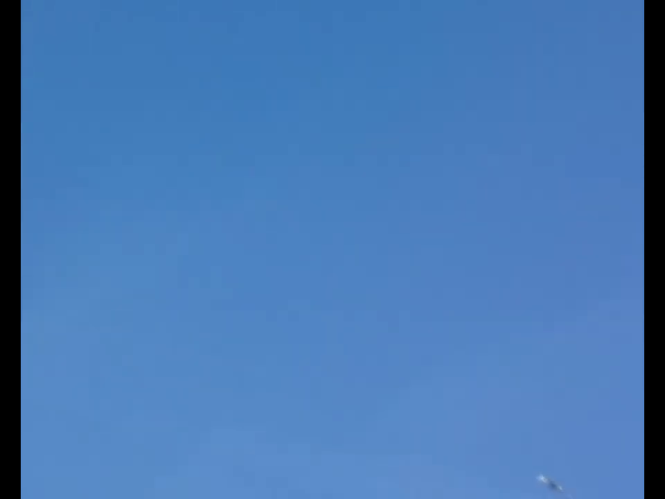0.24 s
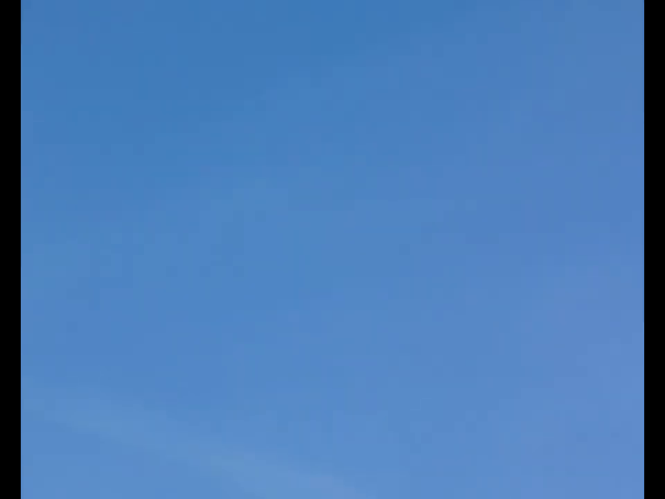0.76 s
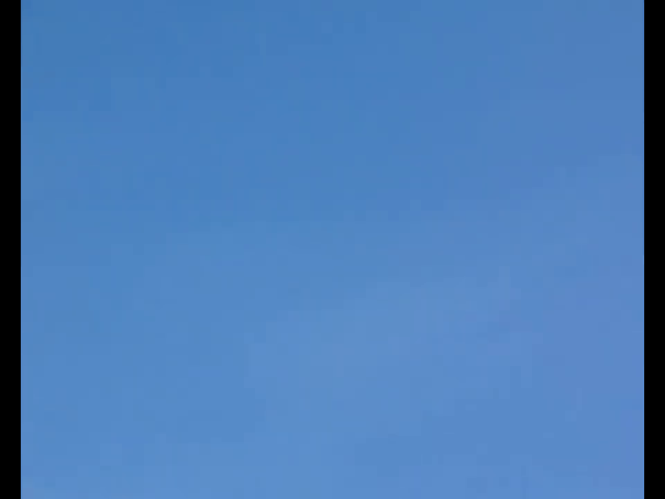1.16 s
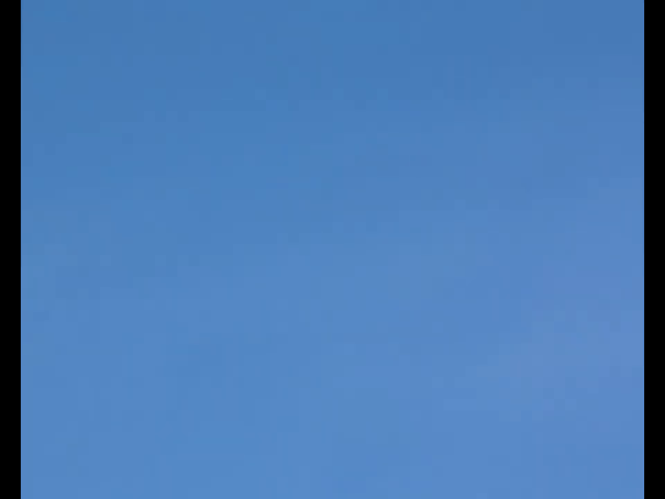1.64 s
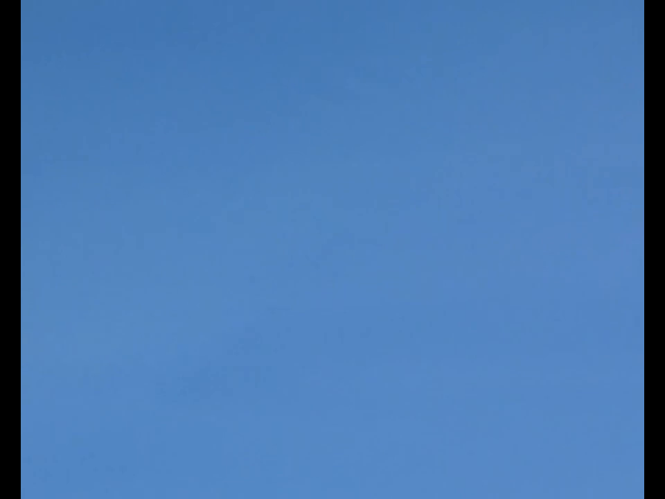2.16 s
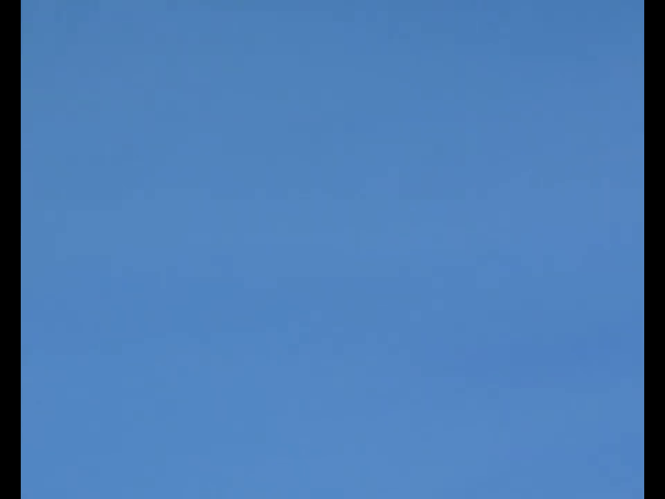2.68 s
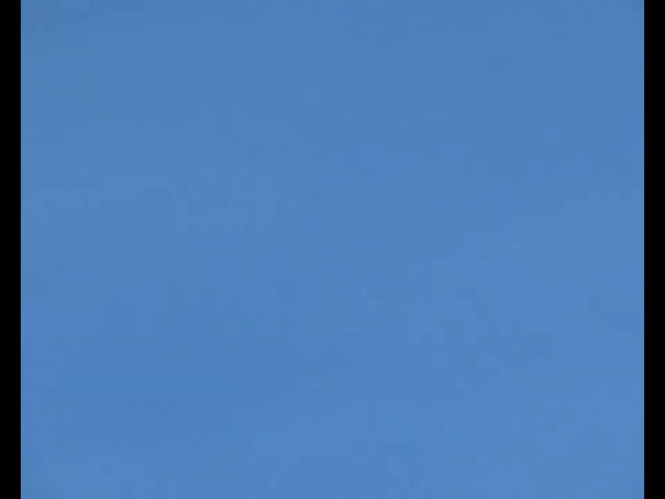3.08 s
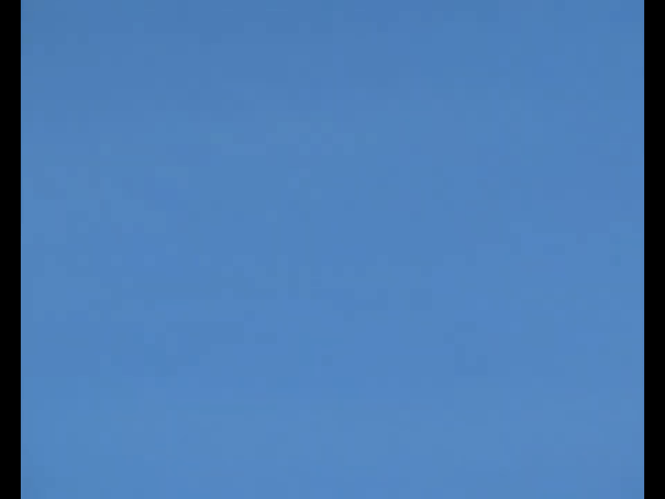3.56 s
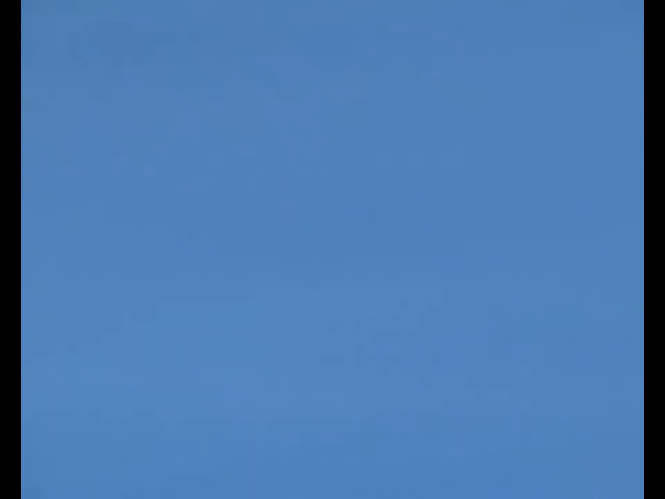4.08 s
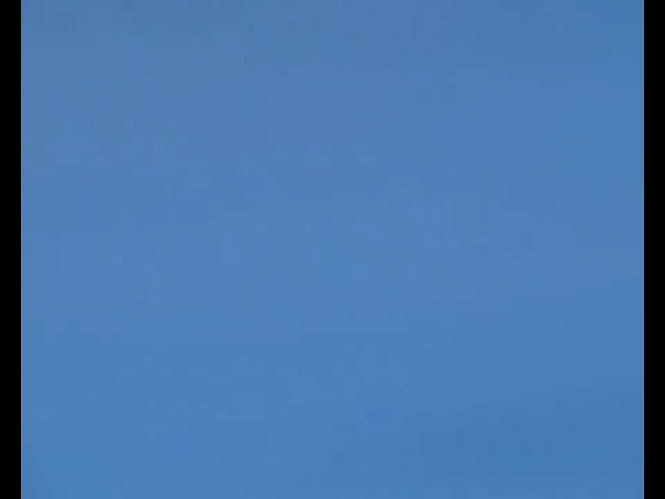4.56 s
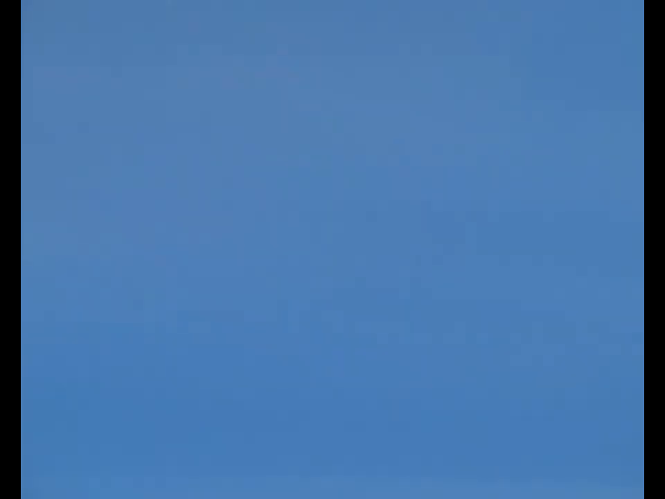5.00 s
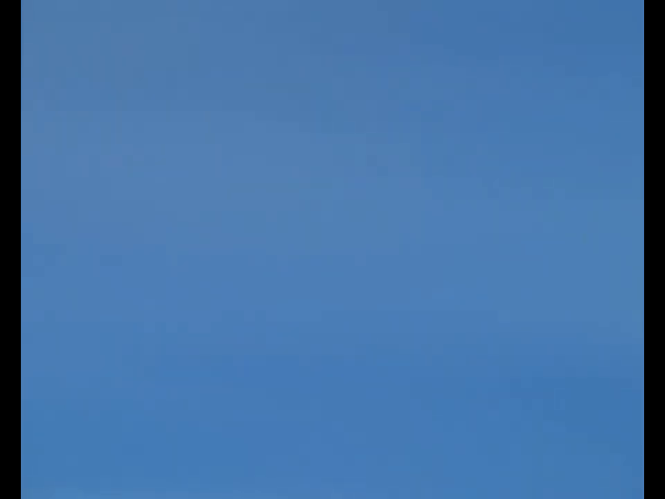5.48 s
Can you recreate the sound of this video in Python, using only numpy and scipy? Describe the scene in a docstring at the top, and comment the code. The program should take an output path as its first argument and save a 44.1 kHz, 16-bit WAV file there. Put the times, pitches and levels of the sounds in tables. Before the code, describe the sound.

A small turbine model jet flies high over an open field. Its rush starts soft and swells in uneven surges, with a slow upward phasing sweep. A hollow howl and a thin whine climb through it, and a brighter howl takes over as the exhaust turns toward the listener. Midway, one small plastic click sounds right at the microphone. Faint open-air rumble and hiss lie underneath.

```python
"""An open field: a small turbine model jet passes high overhead and turns its exhaust to the listener.
Its turbulent rush swells and surges on the moving air; the ground echo combs it into bands that sweep up.
A hollow duct howl, a brighter howl and a thin shaft whine climb through it; early on the intake shrills.
Under it lie open-air rumble, insects and faint, very high whistles. A far bird calls once, there is one
dull bump, and a plastic click rocks the camera, which adds its own hiss and narrow notches."""
import sys
import numpy as np
from scipy import signal
from scipy.fft import rfft, irfft
from scipy.io import wavfile
from scipy.ndimage import uniform_filter1d, map_coordinates

SR = 44100
rng = np.random.default_rng(int(sys.argv[2]) if len(sys.argv) > 2 else 0)


def store_pcm(level_fs):
    """Save levels as 16-bit WAV."""
    pcm = np.round(np.clip(level_fs, -1, 1) * 32767).astype(np.int16)
    wavfile.write(sys.argv[1], SR, np.atleast_2d(pcm).T)


N = 253134
T, HZ = np.arange(N) / SR, np.fft.rfftfreq(N, 1 / SR)
FRAME, HOP = 1024, 256
FRAME_S, BIN_HZ = np.arange(N // HOP + 5) * HOP / SR, np.fft.rfftfreq(FRAME, 1 / SR)

# the turbine shaft's pitch as it reaches the listener: (time [s], pitch [Hz])
SHAFT_PITCH = [(0, 1302), (.45, 1352), (.7, 1454), (1.2, 1580), (1.55, 1661), (2.05, 1750), (2.45, 1805),
               (2.85, 1850), (3, 1864), (3.6, 1868), (4, 1910), (4.3, 1937), (5.74, 1975)]


def amp(db):
    """Decibels to gain."""
    return 10 ** (np.asarray(db) / 20)


def unit_rms(x):
    """Scales to an rms of one."""
    return x / np.sqrt(np.mean(x ** 2) + 1e-20)


def eq_curve(points, hz):
    """Joins (frequency, value) points on a log-frequency axis."""
    f, value = np.transpose(points)
    return np.interp(np.log(hz + 1), np.log(f + 1), value)


def curves(rows, at):
    """One curve for each later column of a table, read along its first column."""
    axis, *columns = np.transpose(rows)
    return [np.interp(at, axis, column) for column in columns]


def coloured(gain):
    """Steady noise of rms one, shaped by a gain for each frequency in HZ."""
    return unit_rms(irfft(rfft(rng.standard_normal(N)) * gain, N))


def noise_band(centre_hz, half_width_hz, slope=4):
    """Steady noise in one band; a higher slope gives steeper skirts."""
    return coloured(1 / (1 + ((HZ - centre_hz) / half_width_hz) ** slope))


def wander(rate_hz):
    """Random drift that thins out above the given rate."""
    return noise_band(0, rate_hz, slope=2)


def blown(hz, half_width_hz):
    """A narrow, breathy band of noise that follows the pitch curve hz."""
    phase = 2 * np.pi * np.cumsum(hz) / SR
    return wander(half_width_hz) * np.cos(phase) + wander(half_width_hz) * np.sin(phase)


def strike(start_s, rise_s, t60):
    """Envelope of a hit: quick attack, exponential decay."""
    age = np.maximum(T - start_s, 0)
    return amp(-60 * np.minimum(age / t60, 10)) * (1 - np.exp(-age / rise_s))


def eddies(frames, bins):
    """Turbulence as random patches in time and frequency."""
    patches = uniform_filter1d(rng.standard_normal((len(FRAME_S), len(BIN_HZ))), frames, axis=0)
    return unit_rms(uniform_filter1d(patches, bins, axis=1, mode="wrap"))


def band_db(spectra, low_hz, high_hz):
    """Level of one band in each frame."""
    inside = (BIN_HZ >= low_hz) & (BIN_HZ < high_hz)
    return 10 * np.log10((spectra[:, inside] ** 2).sum(1))


def exhaust_colour():
    """The exhaust's spectrum in each frame: it turns with the jet and resonates in the tail pipe."""
    # the exhaust from ahead, from the side and from astern: (frequency [Hz], relative level [dB])
    ahead = [(20, -70), (50, -39), (130, -28), (220, -3), (320, -14), (470, -3.5), (640, -7.5), (760, .8),
             (950, 0), (1450, -3), (2300, -11.5), (2900, -20.5), (3600, -26), (4700, -20), (6500, -30),
             (9000, -49), (15000, -89)]
    abeam = [(20, -70), (50, -49), (130, -25), (175, -11), (220, -9), (320, -13), (430, -8.5), (540, 3.2),
             (700, -8), (1100, -9.3), (1500, -8.6), (2000, -10.7), (2900, -16.5), (4800, -23.5),
             (6800, -33), (9000, -45), (15000, -87)]
    astern = [(20, -70), (50, -46), (130, -30), (168, -14.5), (215, -12.5), (310, -13.5), (450, -4.3),
              (640, -2), (770, -3.2), (1050, 2), (1230, -2), (1600, 0), (2300, -5.2), (3200, -14.8),
              (5200, -19.3), (6800, -27.2), (9000, -46), (15000, -87)]
    # the side facing the listener: (time [s], side [0 ahead, 1 abeam, 2 astern])
    facing = [(0.0, 0.53), (1.1, 0.24), (1.6, 0.81), (2.3, 0.74), (2.9, 1.17), (3.4, 1.47), (5.74, 2.0)]
    # the tail pipe's lowest resonance as it arrives: (time [s], pitch [Hz])
    pipe_pitch = [(0, 768), (.65, 747), (1.3, 650), (2, 640), (2.6, 625), (3.2, 655), (3.9, 710),
                  (4.3, 746), (5, 768), (5.74, 790)]
    # its overtones and the hollows between: (frequency [multiple of that pitch], gain [dB])
    pipe_overtones = [(.7, 0), (1, .8), (1.3, -.4), (1.76, -1), (2.2, 1.2), (2.68, -2), (3.15, 2.5),
                      (3.5, -3.8), (4, 3.8), (4.33, -2.6), (4.8, .4), (5.6, 0)]
    side = curves(facing, FRAME_S)[0][:, None]
    side_db = sum(np.maximum(1 - abs(side - k), 0) * eq_curve(spectrum, BIN_HZ)
                  for k, spectrum in enumerate([ahead, abeam, astern]))
    pipe_hz, = curves(pipe_pitch, FRAME_S)
    pipe_db, = curves(pipe_overtones, BIN_HZ / pipe_hz[:, None])
    return amp(side_db + pipe_db)


def surges():
    """Moving air carries the jet over in surges and lulls: dB lifts of rush, hiss and fizz per frame."""
    # each gust sets in, holds and lets go: (start [s], length at half height [s], rise [s], fall [s],
    # rush lift [dB], hiss lift [dB], further lift of the top fizz [dB])
    gusts = [(0.01, 0.049, 0.048, 0.028, 1.7, 4.3, -0.2), (0.247, 0.102, 0.049, 0.031, 0.4, 3.5, -0.9),
             (0.465, 0.05, 0.02, 0.02, 0, -2, 0), (0.51, 0.173, 0.057, 0.044, 3.3, 2.4, 0.6),
             (0.755, 0.125, 0.03, 0.04, -1.5, -2, 1), (0.968, 0.233, 0.038, 0.031, 0.7, 2.3, 1.3),
             (1.318, 0.113, 0.059, 0.027, -0.9, 1.8, 1.5), (1.44, 0.04, 0.015, 0.03, 0, -3.5, -1),
             (1.665, 0.059, 0.038, 0.025, 1.7, 3.8, -1.0), (1.765, 0.045, 0.056, 0.029, -2.4, -0.5, 0.8),
             (1.903, 0.12, 0.048, 0.043, 1.9, 2.5, 0.6), (2.093, 0.141, 0.074, 0.058, 3.2, 5.6, 1.3),
             (2.391, 0.091, 0.055, 0.028, 2.1, 3.8, 1.4), (2.531, 0.085, 0.041, 0.042, 0.2, 2.2, -0.7),
             (2.672, 0.14, 0.069, 0.092, 2.2, 7.3, -1.7), (2.822, 0.091, 0.061, 0.024, -2.0, 2.2, -0.9),
             (2.995, 0.241, 0.056, 0.026, 3.5, 6.7, -2.5), (3.397, 0.212, 0.052, 0.029, 2.2, 5.6, -0.5),
             (3.732, 0.054, 0.029, 0.04, 0.8, 2.6, -0.2), (3.749, 0.074, 0.05, 0.039, 1.4, -0.2, -1.1),
             (3.915, 0.171, 0.055, 0.051, 1.2, 3.6, -1.4), (4.23, 0.173, 0.052, 0.033, 3.3, 5.2, -1.2),
             (4.406, 0.035, 0.036, 0.054, -0.2, -5.2, -0.7), (4.438, 0.05, 0.043, 0.049, 1.5, 4.3, 0.5),
             (4.565, 0.042, 0.028, 0.035, 2.3, 1.2, 2.7), (4.672, 0.045, 0.042, 0.045, 2.4, -0.7, 0.8),
             (4.821, 0.087, 0.08, 0.031, 2.3, 3.6, 1.4), (4.899, 0.15, 0.048, 0.045, -1.2, 0.5, 2.8),
             (5.141, 0.158, 0.058, 0.042, 3.7, 6.7, 1.9), (5.425, 0.067, 0.025, 0.045, 1.5, 4.4, -0.8),
             (5.553, 0.053, 0.041, 0.041, 4.6, 6.6, -3.1), (5.676, 0.04, 0.023, 0.043, 1.4, 4.1, -5.0)]
    lifts_db = 0
    for start, length, rise_s, fall_s, *lift_db in gusts:
        rise = np.clip(.5 + (FRAME_S - start) / rise_s, 0, 1)
        fall = np.clip(.5 + (start + length - FRAME_S) / fall_s, 0, 1)
        lifts_db = lifts_db + np.outer(lift_db, rise * fall)
    return lifts_db


def exhaust(gain_db=2.3, roar_trim_db=.15, hiss_trim_db=-.4, roar_share=.16, flutter=1., patchiness=2.2):
    """Turbulent jet noise: deep roar from the plume, hiss from the nozzle, both shaken by the air."""
    # the pass's slow swell in calm air, in relative levels: (time [s], roar [dB], rush [dB], hiss [dB])
    calm_pass = [(0.0, -43.3, -41.62, -58.99), (0.85, -41.3, -39.96, -53.38), (1.1, -38.0, -36.86, -48.36),
                 (1.8, -36.7, -34.11, -49.04), (2.35, -36.7, -32.96, -48.75), (2.9, -33.8, -28.3, -48.96),
                 (3.3, -34.0, -29.62, -45.0), (3.7, -34.0, -26.13, -38.22), (4.15, -31.0, -23.42, -36.9),
                 (4.55, -31.5, -28.19, -39.15), (4.95, -32.8, -25.59, -35.35),
                 (5.36, -32.8, -27.91, -40.77), (5.74, -33.6, -28.16, -35.77)]
    roar, rush, hiss = curves(calm_pass, FRAME_S)
    rush_lift, hiss_lift, fizz_lift = surges()
    colour = exhaust_colour()
    # three faders, blended across the spectrum; long waves take only a share of each gust
    roar_db = roar + roar_share * rush_lift + roar_trim_db - band_db(colour, 180, 700)
    rush_db = rush + rush_lift - band_db(colour, 750, 2500)
    hiss_db = hiss + hiss_lift + hiss_trim_db - band_db(colour, 3200, 8000)
    lows = eq_curve([(500, .92), (950, .025)], BIN_HZ)
    highs = eq_curve([(1900, 0), (3700, .98)], BIN_HZ)
    swell_db = np.outer(roar_db, lows) + np.outer(rush_db, 1 - lows - highs) + np.outer(hiss_db, highs)
    # long waves ride smoothly through the gusts; short ones surge and twinkle most
    fast_rush_db = rush_db - uniform_filter1d(rush_db, size=40)
    fast_hiss_db = hiss_lift - uniform_filter1d(hiss_lift, size=120)
    rush_depth = eq_curve([(500, -.14), (900, -.29), (1500, -.12), (2200, .53), (3700, .0076)], BIN_HZ)
    hiss_depth = eq_curve([(1500, 0), (2300, .15), (4500, .16), (9000, .26)], BIN_HZ)
    swell_db += np.outer(fast_rush_db, rush_depth) + np.outer(fast_hiss_db, hiss_depth)
    swell_db += np.outer(fizz_lift, eq_curve([(4600, 0), (6000, 1)], BIN_HZ))
    twinkle = flutter * eddies(frames=4, bins=400) + patchiness * np.tanh(eddies(frames=10, bins=14))
    twinkle_db = twinkle * eq_curve([(300, .072), (1500, .55), (5000, 1.29)], BIN_HZ)
    real, imaginary = rng.standard_normal((2,) + colour.shape)
    spectra = colour * amp(swell_db + twinkle_db) * (real + 1j * imaginary)
    return amp(gain_db) * signal.istft(spectra.T, nperseg=FRAME, noverlap=FRAME - HOP)[1][:N]


def ground_echo(sound, softness=.12, waver_ms=.014, steep_loss=.1):
    """Direct sound and ground echo add and cancel in evenly spaced bands, deepest when the jet is low."""
    # the echo comes sooner as the jet sinks to the horizon: (time [s], delay [ms])
    echo_delay = [(0, 4.61), (.35, 4.12), (.65, 3.59), (.85, 3.31), (1.05, 3.11), (1.25, 2.81),
                  (1.45, 2.65), (1.8, 2.53), (2.12, 2.62), (2.35, 2.52), (2.75, 2.27), (2.95, 2.22),
                  (3.25, 2.18), (3.42, 2.21), (3.7, 2.14), (4.05, 2.11), (4.16, 1.99), (4.32, 1.945),
                  (4.58, 1.985), (4.75, 1.92), (5, 1.915), (5.22, 1.805), (5.45, 1.76), (5.55, 1.79),
                  (5.74, 1.7)]
    # grass scatters short waves; at a grazing angle: (frequency [Hz], reflected share [0-1])
    reflection = [(150, .95), (500, .78), (700, .68), (1000, .74), (2000, .6), (4000, .48), (8000, .32)]
    delay_ms = curves(echo_delay, T)[0] + waver_ms * wander(12)  # moving air makes the bands waver
    share = np.clip(eq_curve(reflection, HZ), 0, .95)
    soft_ground_phase = softness * eq_curve([(200, .22), (900, .97), (2000, 0), (3500, .4)], HZ)
    direct = rfft(sound) / np.sqrt(1 + share ** 2)
    reflected = irfft(direct * share * np.exp(-1j * soft_ground_phase), N)
    echo = map_coordinates(reflected, [(T - delay_ms / 1000) * SR], order=3)
    grazing = (delay_ms.min() / delay_ms) ** steep_loss  # a steeper angle reflects less
    return irfft(direct, N) + grazing * echo


def ambience(level_db=-53.):
    """Low rumble of the open air, falling away into microphone hiss."""
    # the bed of air and hiss: (frequency [Hz], relative level [dB])
    bed = [(24, -60), (32, -29), (55, -11), (80, -3.5), (130, -13), (170, -2.5), (260, -10), (600, -9.5),
           (2000, -6.5), (6000, -34.5), (9000, -38.5), (10600, -30), (12500, -37), (15500, -38)]
    return amp(level_db) * coloured(amp(eq_curve(bed, HZ)))


def insects(level_db=-66., swell_db=1.8):
    """A faint, narrow shrill from the grass."""
    shrill = noise_band(centre_hz=4950, half_width_hz=60)
    return amp(level_db + swell_db * wander(14)) * shrill


def whine(waver=.0012, fading_db=2.5):
    """The shaft tone and two octaves above it, wavering and fading on the long path."""
    # the whine is lost once the exhaust points at the listener:
    # (time [s], shaft tone [dB], octave [dB], double octave [dB])
    tone_levels = [(0, -62, -68, -85), (.45, -58, -67, -82), (.57, -43, -66, -80), (.66, -45, -64, -79),
                   (.75, -58, -62, -78), (1.02, -58, -64, -72), (1.24, -58, -52, -72),
                   (1.65, -50, -62, -70), (2.25, -54, -50, -80), (2.7, -60, -66, -82), (3, -58, -63, -65),
                   (3.75, -53, -59, -70), (4, -38, -48, -69), (4.3, -58, -67, -66), (5.74, -75, -77, -85)]
    hz, = curves(SHAFT_PITCH, T)
    phase = 2 * np.pi * np.cumsum(hz * (1 + waver * wander(25))) / SR
    return np.sqrt(2) * sum(amp(db + fading_db * wander(15)) * np.sin(2 ** octave * phase)
                            for octave, db in enumerate(curves(tone_levels, T)))


def howl(shaft_ratio=.452):
    """Air through the duct rings one resonance, which the jet's motion shifts in step with the whine."""
    # the hollow howl's envelope: (time [s], level [dB])
    envelope = [(0, -74), (.5, -48), (.95, -39.5), (1.45, -38.5), (1.7, -43), (3, -42), (3.4, -64),
                (4, -71)]
    db, = curves(envelope, T)
    shaft_hz, = curves(SHAFT_PITCH, T)
    return amp(db) * blown(shaft_ratio * shaft_hz, half_width_hz=46.)


def intake():
    """Air rushing into the intake whistles in one narrow band."""
    # the shrill carries while the intake faces the listener: (time [s], level [dB])
    envelope = [(0, -70), (.45, -68), (.7, -61), (1.05, -58), (1.4, -66), (1.75, -58), (2.1, -64),
                (2.6, -63), (3, -80)]
    db, = curves(envelope, T)
    return amp(db) * noise_band(centre_hz=4670, half_width_hz=55)


def bird(gain_db=-.3, roughness=.021, echo_s=.018, echo_db=-6.):
    """A far, rough whistle that arches and falls, smeared by one echo."""
    # one slurred note: (time [s], pitch [Hz], relative level [dB])
    slur = [(.11, 4350, -66), (.145, 4780, -53), (.18, 4900, -56), (.22, 4580, -54), (.26, 4000, -53),
            (.29, 3430, -54), (.32, 2740, -50), (.34, 2580, -70)]
    hz, db = curves(slur, T)
    phase = 2 * np.pi * np.cumsum(hz * (1 + roughness * wander(300))) / SR
    singing = (T > slur[0][0]) & (T < slur[-1][0])
    call = amp(db + gain_db) * np.sin(phase) * singing
    return call + amp(echo_db) * np.interp(T - echo_s, T, call)


def bump(level_db=-38.):
    """One soft, dull bump of low noise."""
    body = noise_band(centre_hz=280, half_width_hz=140)
    return amp(level_db) * body * strike(start_s=.945, rise_s=.005, t60=.09)


def upper_howl(gain_db=-1.):
    """A bright, hollow band in the rush, rising from about 1.3 to 1.7 kHz."""
    # the band's climb: (time [s], pitch [Hz], relative level [dB])
    climb = [(2.4, 1290, -62), (2.75, 1320, -40), (2.95, 1350, -39), (3.3, 1390, -47), (3.5, 1450, -36),
             (4.02, 1440, -33), (4.25, 1550, -32), (4.5, 1510, -39), (4.8, 1540, -35), (5.2, 1625, -34),
             (5.4, 1640, -42), (5.74, 1680, -42)]
    hz, db = curves(climb, T)
    return amp(db + gain_db) * blown(hz, half_width_hz=45.)


def click(rise_s=.0002, tilt_db_per_octave=0.):
    """One small click: a cluster of snaps, each ringing the plastic for a few milliseconds."""
    # the snaps: (time [s], relative level [dB], ring [Hz], bandwidth [Hz], t60 [s])
    snaps = [(3.0782, -23, 4230, 800, 0.014), (3.0778, -34, 11500, 5000, .0099),
             (3.0798, -31.5, 11500, 3500, .008), (3.0802, -22, 2480, 500, .016),
             (3.0811, -21, 5350, 600, .015), (3.0824, -28, 7450, 700, .013)]
    out = np.zeros(N)
    for start_s, db, hz, width_hz, t60 in snaps:
        ring = noise_band(hz, width_hz / 2, slope=2)
        envelope = amp(db + tilt_db_per_octave * np.log2(hz / 5000)) * strike(start_s, rise_s, t60)
        out += np.sqrt(np.mean(envelope ** 2)) * unit_rms(ring * envelope)
    return out


def knock(rise_s=.002):
    """The click rocks the camera body, which rings briefly."""
    # the body's one resonance: (time [s], level [dB], ring [Hz], t60 [s])
    body_ring = (3.0812, -14.5, 500, .028)
    start_s, db, hz, t60 = body_ring
    return amp(db) * strike(start_s, rise_s, t60) * np.sin(2 * np.pi * hz * (T - start_s))


def scene(air_side_db=-21.5, click_side_db=-10.5):
    """The jet reaches a close microphone pair alike; the open air and the click differ between them."""
    jet = ground_echo(exhaust()) + howl() + upper_howl() + whine() + intake()
    mid = jet + bird() + insects() + click() + bump() + ambience()
    side = amp(air_side_db) * ambience() + amp(click_side_db) * click(tilt_db_per_octave=2.)
    side += knock()  # pushes the two capsules opposite ways
    return np.array([mid + side, mid - side])


def camera_comb(spacing_hz=300, half_width_hz=17, even_db=-7, odd_db=-2.3):
    """Gain of the camera's narrow, evenly spaced notches; every second one is deeper."""
    notch = np.round(HZ / spacing_hz)
    depth_db = np.where(notch % 2, odd_db, even_db) * (notch > 0)
    return amp(depth_db / (1 + ((HZ - notch * spacing_hz) / half_width_hz) ** 2))


def record(dry, hiss_db=-76., cutoff_hz=15750):
    """Two slightly unequal capsules with their own hiss; then faint high whistles and a band limit."""
    # faint, steady, very high whistles: (frequency [Hz], level [dB])
    whistles = [(10401, -95), (10497, -93), (11100, -94), (14702, -97), (15299, -93), (15625, -81)]
    balance_db = eq_curve([(2200, .19), (4500, .57), (7000, .6), (9000, -.1)], HZ)
    left_lead_rad = eq_curve([(120, .05), (300, .025), (700, .041), (1000, .01), (1500, .086),
                              (2500, .017), (5000, .22), (9000, .05)], HZ)
    left_gain = amp(balance_db / 2) * np.exp(.5j * left_lead_rad)
    stereo = irfft(rfft(dry) * camera_comb() * np.array([left_gain, 1 / left_gain]), N)
    stereo += amp(hiss_db) * rng.standard_normal((2, N))
    stereo += sum(amp(db) * np.sqrt(2) * np.sin(2 * np.pi * hz * T) for hz, db in whistles)
    lowpass = signal.firwin(511, cutoff_hz, window=("kaiser", 9), fs=SR)
    return signal.oaconvolve(stereo, lowpass[None], "same")


dry = scene()
out = record(dry)
store_pcm(out)
```